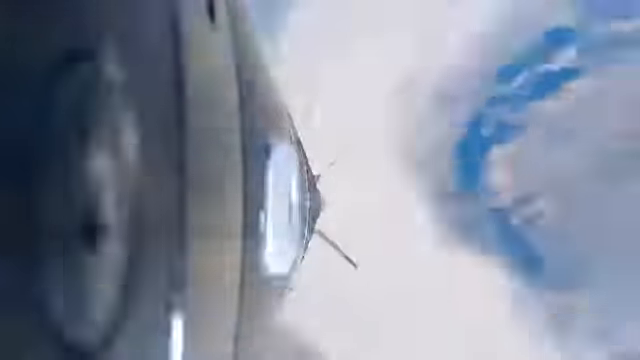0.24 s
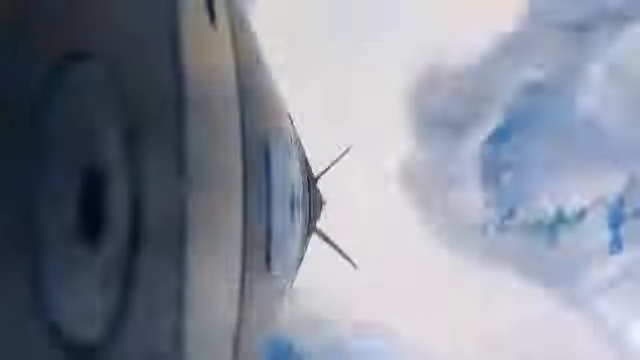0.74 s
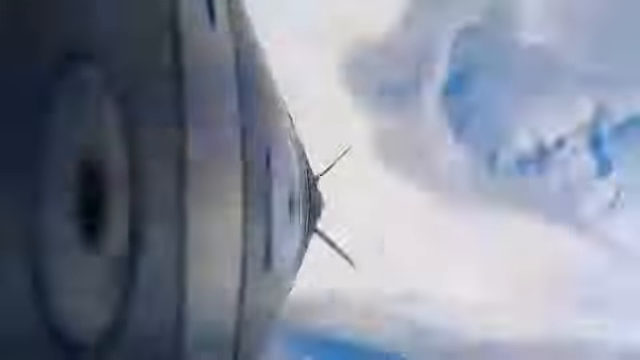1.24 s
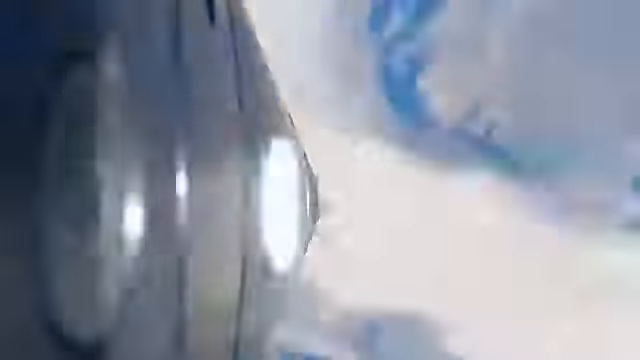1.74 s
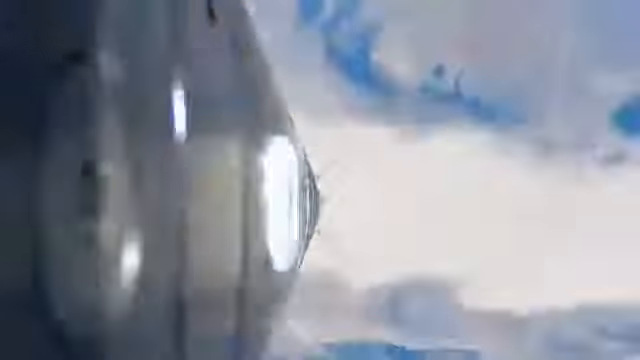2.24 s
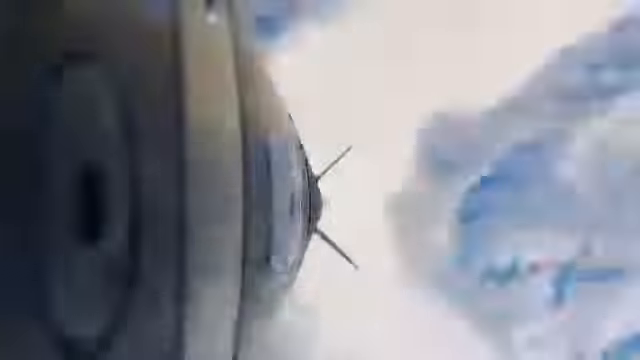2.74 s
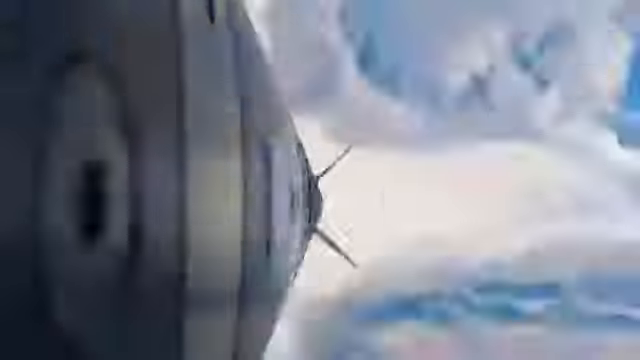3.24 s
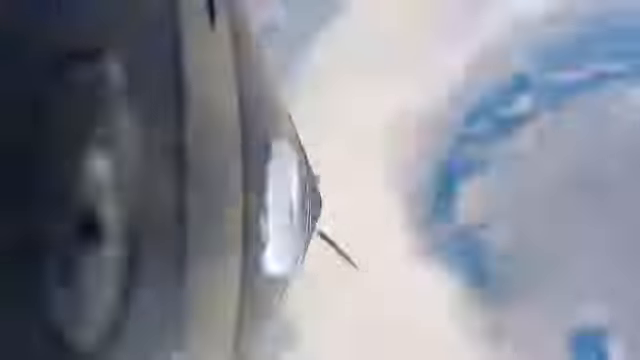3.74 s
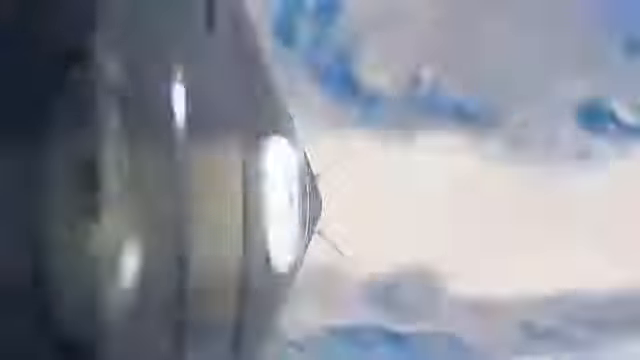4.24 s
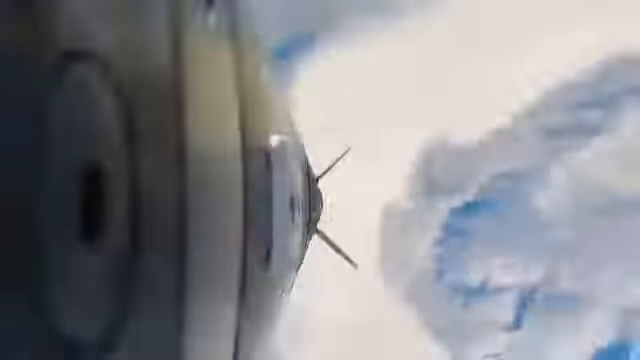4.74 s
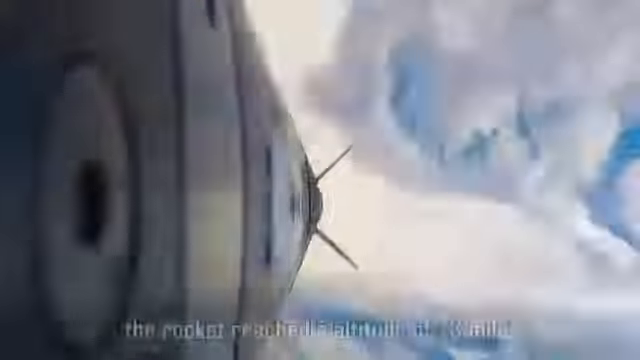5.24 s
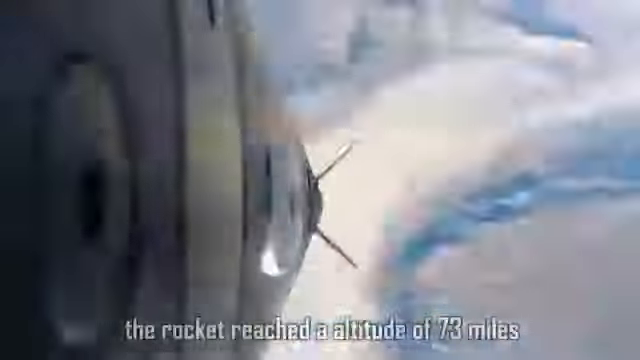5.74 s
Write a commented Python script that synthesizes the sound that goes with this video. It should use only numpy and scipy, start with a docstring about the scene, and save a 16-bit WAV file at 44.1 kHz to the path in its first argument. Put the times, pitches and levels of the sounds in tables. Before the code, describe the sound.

Steady rough rocket roar: a throaty, hollow hum with random surges, rushing air hiss and gritty low-quality digital fizz, never stopping.

```python
"""On the skin of a climbing rocket rides a small camera. Motor vibration and buffeting air shake the hollow
body, which drones at its low modes: resonant filters on noise, its loudest chance peaks set as tone bursts.
The slipstream hisses in the camera housing: flickering noise through its modes, over a broad fizz.
The camera ducks its gain on peaks and holds each sample of a slow converter, which mirrors the whole sound
into the treble. Low buffeting rumble and faint coding noise lie beneath."""
import sys
import numpy as np
from scipy import signal
from scipy.fft import rfft, irfft
from scipy.io import wavfile
from scipy.ndimage import uniform_filter1d

SR = 44100
rng = np.random.default_rng(int(sys.argv[2]) if len(sys.argv) > 2 else 0)


def unload_wav(signal):
    """Save mono or channel-first audio to the path in sys.argv[1] as 16-bit WAV at rate SR, clipped to [-1, 1]."""
    wavfile.write(
        sys.argv[1],
        SR,
        np.round(np.clip(np.atleast_2d(signal).T, -1, 1) * 32767).astype(np.int16),
    )


N = 263718

# the two body modes that carry the drone: [f/Hz, width/Hz, relative level/dB]
MAIN_MODES = [(356.4, 22.5, -1), (386.2, 18, -2)]
# other modes of the body tube: [f/Hz, width/Hz, relative level/dB]
BODY_MODES = [(158.2, 46.6, -12), (192.3, 15.3, -10.5), (282.6, 60, -5), (493, 74, -8), (539.6, 59, -6),
              (639.8, 28.5, -1), (682, 30, -4.5), (768, 99, -17.5), (937, 7.2, -22.5)]
# modes of the camera housing: [f/Hz, width/Hz, relative level/dB]
HOUSING_MODES = [(1179, 104, 1.5), (1234, 43, -2), (1550, 230, -7.5), (1798, 55, 0.5), (1937, 100, 1),
                 (2186, 170, 3.5), (2453, 246, -2), (2668, 46, -4.5), (3084, 220, -3), (3260, 59, -6.5),
                 (3720, 150, -13.5), (4310, 600, -14.5)]
# course of the flight: [t/s, main drone level/dB, body shaking level/dB, slipstream level/dB,
# fizz level relative to the housing modes/dB, buffeting rumble level/dB]
FLIGHT_LEVELS = [(0.0, -16.5, -18, -30, -1, -45), (0.6, -13, -15.5, -28, -4.5, -47),
                 (1.4, -13.5, -16, -29, -8.5, -43.5), (2.3, -13.5, -17.5, -29, -10.5, -44.5),
                 (3.6, -14.5, -18, -30, -8, -52), (4.0, -14.5, -16, -27, -15.5, -50),
                 (5.3, -14.5, -16, -26.5, -9, -46), (5.6, -19.5, -17, -31, -7.5, -46),
                 (6.0, -16, -19.5, -27.5, -5.5, -48)]
# the loudest chance peaks of the noisy drone, before the gain control: [t/s, peak level/dB, half length/s]
DRONE_PEAKS = [(0.106, -4.5, 0.011), (0.378, -2.5, 0.0094), (0.431, -3, 0.016), (0.58, 0, 0.013),
               (0.697, -3.5, 0.016), (0.766, -4.5, 0.023), (0.868, -5, 0.019), (1.08, -6.5, 0.017),
               (1.16, -4.5, 0.014), (1.203, -4, 0.0086), (1.306, -4, 0.019), (1.361, -4.5, 0.017),
               (1.478, -2, 0.011), (1.673, -5.5, 0.0075), (1.716, -3, 0.022), (1.831, -3, 0.0096),
               (1.975, -8, 0.023), (2.053, -8, 0.014), (2.111, -6.5, 0.018), (2.278, -5, 0.012),
               (2.308, -5.5, 0.015), (2.42, -4.5, 0.011), (2.732, -6.5, 0.013), (2.885, -3, .012),
               (3.025, -5.5, 0.015), (3.074, -7, 0.015), (3.235, -5, 0.024), (3.37, -7.5, 0.02),
               (3.509, -4.5, 0.016), (3.641, -1.5, 0.011), (3.727, -5.5, 0.018), (3.785, -4, .015),
               (3.895, -3.5, 0.0065), (3.987, -5.5, 0.0092), (4.167, -6, 0.03), (4.218, -2, 0.012),
               (4.412, -10, .016), (4.802, -3.5, .012), (4.935, -6, 0.0093), (5.207, -2, 0.0065),
               (5.27, -4.5, .013), (5.424, -5.5, 0.0091), (5.761, -6.5, 0.014)]
# gusts that lift the slipstream: [t/s, lift/dB, half length/s]
WIND_GUSTS = [(0.3, 2.5, 0.06), (0.54, 1, 0.064), (1.1, 1, 0.086), (1.673, 1.5, .05), (1.93, 2, 0.032),
              (2.228, 1.5, .08), (2.7, 2, 0.025), (3.23, 2.1, 0.046), (3.47, 3, 0.041), (4.053, 1.5, 0.16),
              (4.45, 1.5, 0.047), (4.617, 1.5, 0.065), (5.036, 1, 0.03), (5.405, 3, 0.048),
              (5.568, 4.5, 0.071), (5.723, 4, .05), (5.846, 2, 0.036)]
# spectrum of the slipstream's fizz: [f/Hz, relative level per Hz/dB]
FIZZ_SPECTRUM = [(900, -8), (1400, -16.5), (2800, -14), (3500, -18), (4800, -21.5), (5500, -24),
                 (5900, -43)]
# spectrum of the buffeting rumble: [f/Hz, relative level per Hz/dB]
RUMBLE_SPECTRUM = [(15, -22), (25, -1.5), (40, -16), (52, -6), (62, 2.5), (78, -3), (98, -4), (115, -30),
                   (200, -48)]
# spectrum of the coding hiss round the mirrored drone: [f/Hz, relative level per Hz/dB]
FUZZ_SPECTRUM = [(9000, -30), (10500, 0), (12000, 5), (13500, -1), (15000, -22)]
# [f/Hz, relative level per Hz/dB]
APART_SPECTRUM = [(20, 7.5), (60, 1), (150, -7), (250, -9), (450, -15), (700, -60), (2000, -90)]

HOLD_HZ = 12000  # sample rate of the slow converter
SECONDS = 6  # length computed before trimming to N samples
EDGE_HZ = 14990  # upper band limit
FUZZ_DB, APART_DB = -48.5, -54.5  # rms levels of the two coding noises
PEAK_HZ, PEAK_SPREAD_HZ = 368.5, 6.2  # mean pitch of the tone bursts and its standard deviation
LULL = 1.25  # the noise sinks round a tone burst for this many times its length


def main_drone(steadiness):
    """Driven resonance: the main modes hold their swing in part, like a blown pipe."""
    resonance = lambda hz: np.sqrt(ringing(MAIN_MODES, hz, skirt=0.9))
    swing = coloured(gusty(gust_db=0.1, gust_hz=20), resonance, HOLD_HZ)
    reach = np.sqrt(abs(uniform_filter1d(swing ** 2, size=150)) + 0.22)
    steadied = swing / reach ** steadiness
    # the tube cannot follow faster than its modes allow
    mode_band = lambda hz: 1 / (1 + ((hz - 373) / 70) ** 4)
    return with_peaks(follow(column=1) * coloured(steadied, mode_band, HOLD_HZ))


def with_peaks(drone):
    """Tone bursts: at listed moments short tones set the drone's chance peaks, the noise sinking around them."""
    t = np.arange(len(drone)) / HOLD_HZ
    calm, bursts = np.ones(len(drone)), np.zeros(len(drone))
    draws = rng.standard_normal((len(DRONE_PEAKS), 2))
    for (centre_s, peak_db, half_s), (detune, turn) in zip(DRONE_PEAKS, draws):
        bell = np.exp(-((t - centre_s) / half_s) ** 2)
        calm *= 1 - bell ** (1 / LULL ** 2)  # a wider bell
        pitch_hz = PEAK_HZ + PEAK_SPREAD_HZ * detune
        bursts += gain_of(peak_db) * bell * np.cos(2 * np.pi * (pitch_hz * (t - centre_s) + turn))
    return calm * drone + bursts


def body_shaking():
    """Forced vibration: turbulent shaking rings the other modes of the tube."""
    resonance = lambda hz: np.sqrt(ringing(BODY_MODES, hz, skirt=1.85))
    return follow(column=2) * coloured(gusty(gust_db=1.18, gust_hz=30), resonance, HOLD_HZ)


def slipstream():
    """Independent excitation: eddies catch each housing mode at their own moments, over a broad fizz."""
    hz = np.fft.rfftfreq(SECONDS * HOLD_HZ, 1 / HOLD_HZ)
    eddies = 0
    for mode in HOUSING_MODES:
        resonance = np.sqrt(ringing([mode], hz, skirt=1.266))
        eddies = eddies + rfft(gusty(gust_db=1.2, gust_hz=14.5)) * resonance
    fizz_gain = lambda hz: gain_of(read(FIZZ_SPECTRUM, hz))
    fizz = coloured(gusty(gust_db=0.6, gust_hz=25), fizz_gain, HOLD_HZ)
    return follow(column=3) * gusts() * (evened(irfft(eddies)) + follow(column=4) * fizz)


def gusts():
    """Amplitude modulation: each gust swells and fades like a bell, in decibels."""
    t = np.arange(SECONDS * HOLD_HZ) / HOLD_HZ
    return gain_of(sum(db * np.exp(-((t - s) / half_s) ** 2) for s, db, half_s in WIND_GUSTS))


def buffeting():
    """Low-frequency turbulence: noise shaped to a rumble that follows the flight."""
    return follow(column=5, rate=SR)[:N] * noise_with(RUMBLE_SPECTRUM)


def mirror_fuzz():
    """Coding noise: a faint steady band of hiss round the mirrored drone."""
    return gain_of(FUZZ_DB) * noise_with(FUZZ_SPECTRUM)


def channel_noise():
    apart = gain_of(APART_DB) * noise_with(APART_SPECTRUM)
    return np.array([apart, -apart])


def ducked(x, knee_db, db_per_s):
    """Gain control: a peak's whole excess over the knee is taken away, then the gain recovers steadily."""
    level_db = 10 * np.log10(abs(uniform_filter1d(x ** 2, size=32)) + 1e-12)
    fall_db = np.arange(len(x)) * db_per_s / HOLD_HZ
    # the highest level so far, sinking at db_per_s
    held_db = np.maximum.accumulate(level_db + fall_db) - fall_db
    over_db = np.maximum(held_db - knee_db, 0)
    late_db = signal.lfilter(np.ones(150) / 150, 1, over_db)  # reacts a few milliseconds late
    return x / gain_of(late_db)


def squeezed(x, knee):
    """Saturation: the preamplifier rounds off whatever passes its knee."""
    room = .93 - knee
    rounded = knee + room * np.tanh((abs(x) - knee) / room)
    return np.where(abs(x) < knee, x, np.sign(x) * rounded)


def held(x):
    """Zero-order hold: holding each sample repeats the spectrum at the converter's rate under a sinc."""
    hz = np.fft.rfftfreq(SECONDS * SR, 1 / SR)
    repeated = np.resize(np.fft.fft(x), len(hz))
    return irfft(repeated * np.sinc(hz / HOLD_HZ), SECONDS * SR)[:N] * SR / HOLD_HZ


def gusty(gust_db, gust_hz):
    """Turbulence: white noise whose strength flickers by gust_db rms, mostly slower than gust_hz."""
    white, slow = rng.standard_normal((2, SECONDS * HOLD_HZ))
    flicker = coloured(slow, lambda hz: 1 / (1 + (hz / gust_hz) ** 2), HOLD_HZ)
    return white * gain_of(gust_db * flicker)


def ringing(modes, hz, skirt):
    """Resonance: summed power of the modes; a larger skirt deepens the valleys."""
    return sum(gain_of(db) ** 2 / (1 + (2 * (hz - f) / width) ** 2) ** skirt for f, width, db in modes)


def noise_with(spectrum):
    """Spectral shaping: white noise given a tabulated spectrum, at rms 1."""
    return coloured(rng.standard_normal(N), lambda hz: gain_of(read(spectrum, hz)), SR)


def coloured(x, gain, rate):
    """Linear filtering: multiplies the spectrum by gain(hz), then scales to rms 1."""
    hz = np.fft.rfftfreq(x.shape[-1], 1 / rate)
    return evened(irfft(rfft(x) * gain(hz), x.shape[-1]))


def follow(column, rate=HOLD_HZ):
    """Slow level change: one column of the flight as gain, interpolated in decibels."""
    rows = np.transpose(FLIGHT_LEVELS)
    return gain_of(np.interp(np.arange(SECONDS * rate) / rate, rows[0], rows[column]))


def read(points, hz):
    """Spectral interpolation: decibels along a logarithmic frequency axis."""
    f, db = np.transpose(points)
    return np.interp(np.log(hz + 1), np.log(f + 1), db)


def evened(x):
    """Normalisation: scales to rms 1."""
    return x / np.sqrt(np.mean(x ** 2) + 1e-20)


def gain_of(db):
    """Logarithmic level: decibels to amplitude gain."""
    return 10 ** (np.asarray(db) / 20)


def scene():
    """Superposition: one microphone through the slow converter, with low buffeting and faint coding noise."""
    sources = main_drone(steadiness=0.1) + body_shaking() + slipstream()
    levelled = ducked(sources, knee_db=-8.0, db_per_s=39.0)
    heard = squeezed(gain_of(1.5) * levelled, knee=.7)
    high_pass = signal.butter(4, 120., "high", fs=SR, output="sos")
    steps = signal.sosfilt(high_pass, held(heard))
    return steps + buffeting() + mirror_fuzz() + channel_noise()


def record(dry):
    """Limited range and band: full-scale clipping, then a steep low-pass."""
    clipped = np.clip(dry, -1, 1)
    low_pass = signal.firwin(2047, EDGE_HZ, window=("kaiser", 9), fs=SR)
    return signal.oaconvolve(clipped, low_pass[None], "same")


dry = scene()
out = record(dry)
unload_wav(out)
```